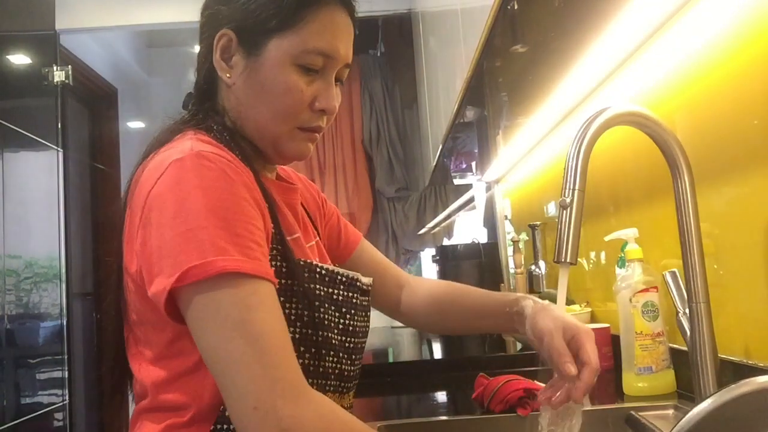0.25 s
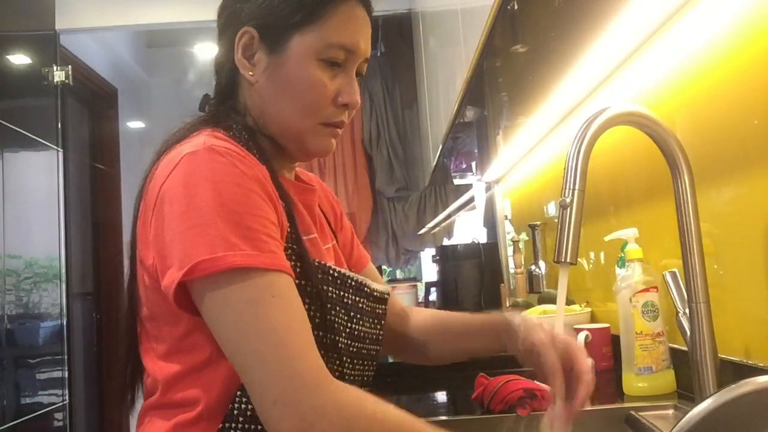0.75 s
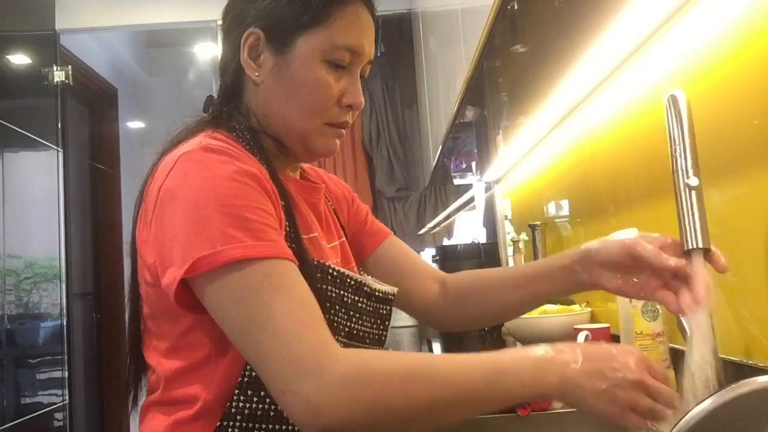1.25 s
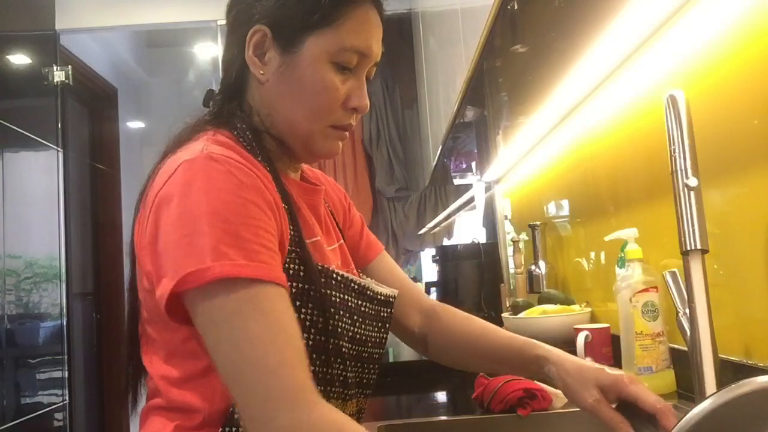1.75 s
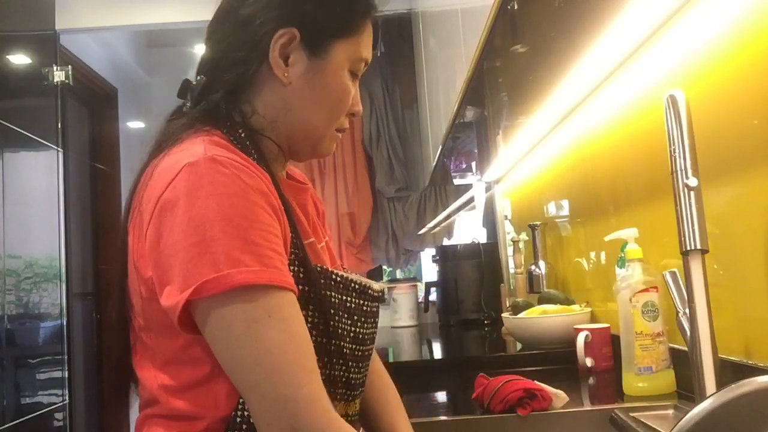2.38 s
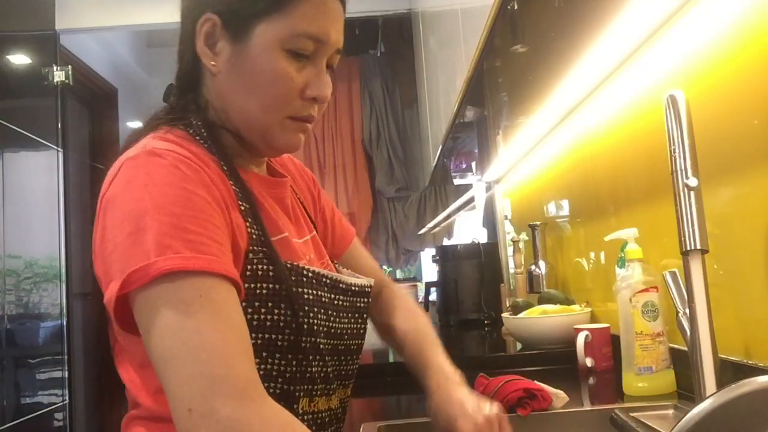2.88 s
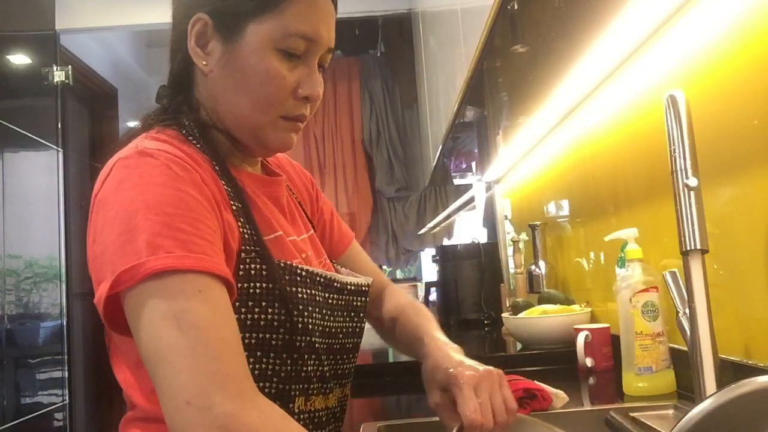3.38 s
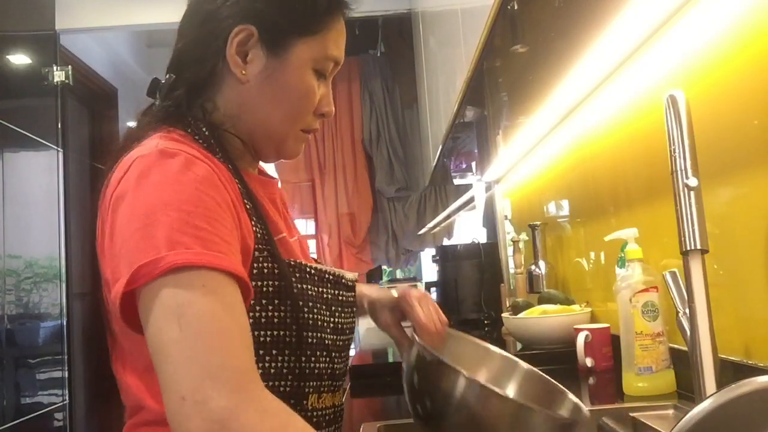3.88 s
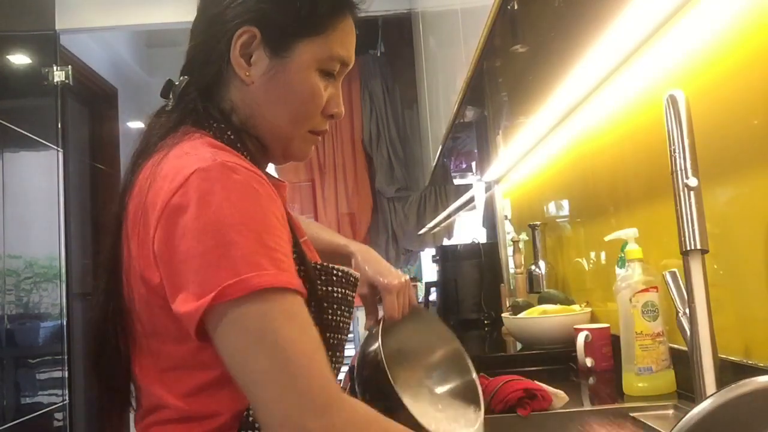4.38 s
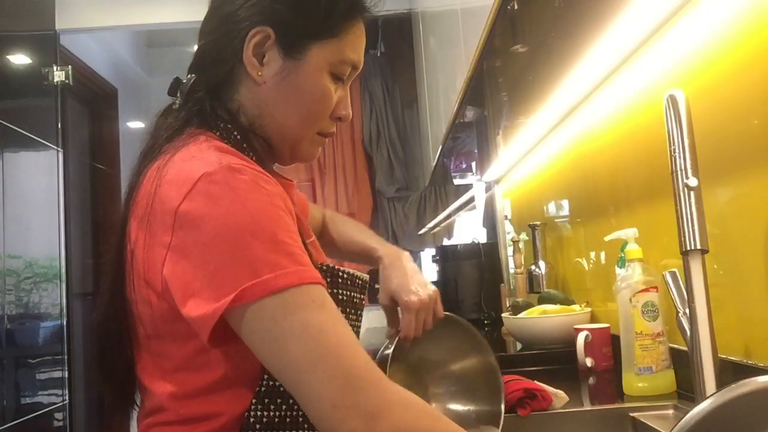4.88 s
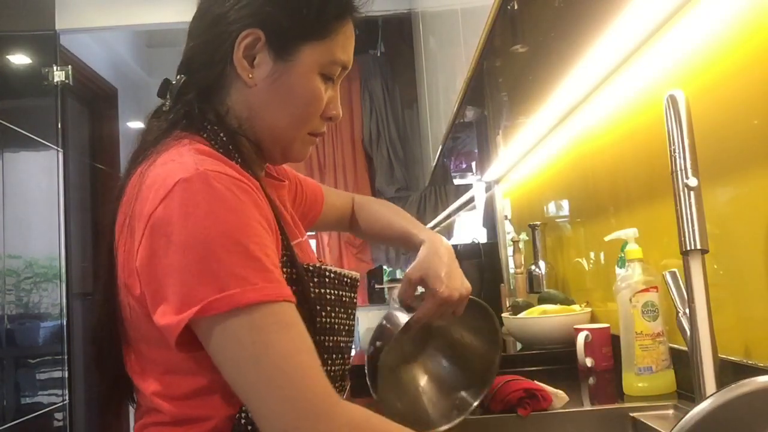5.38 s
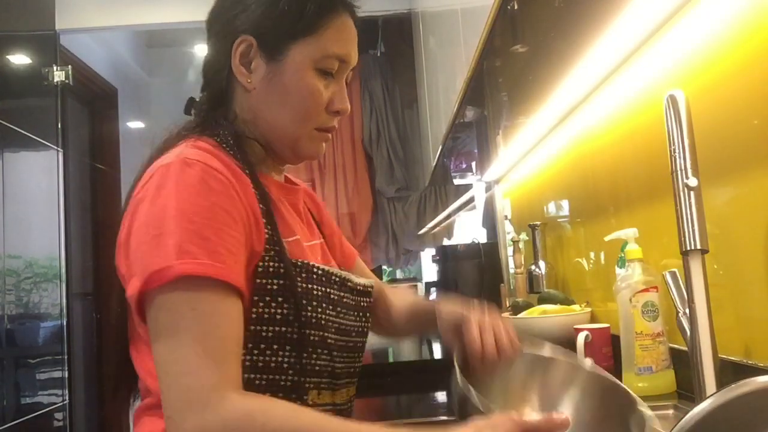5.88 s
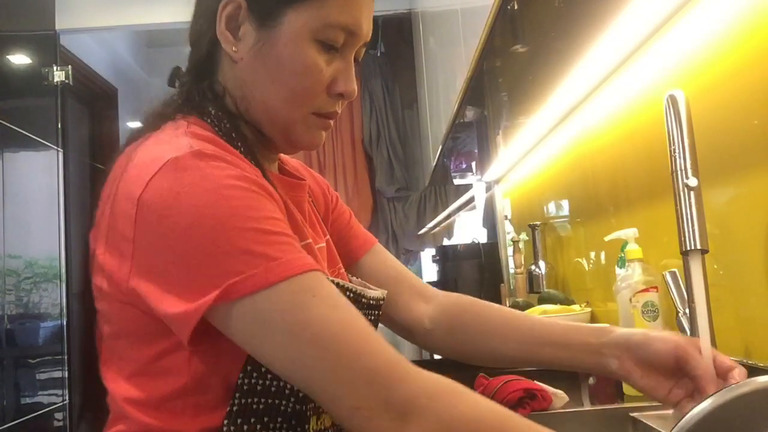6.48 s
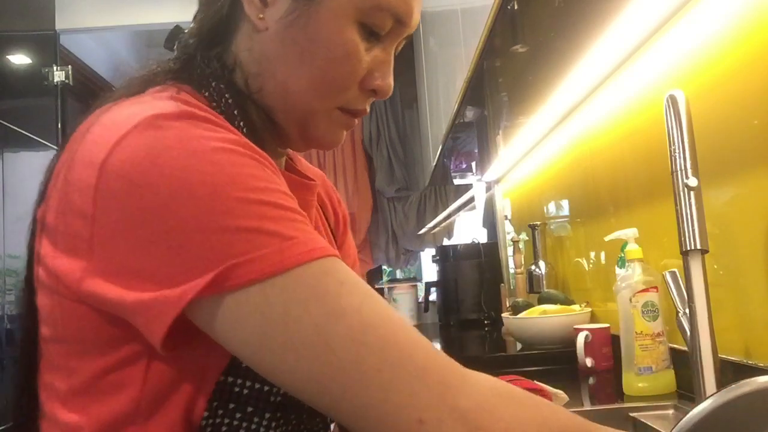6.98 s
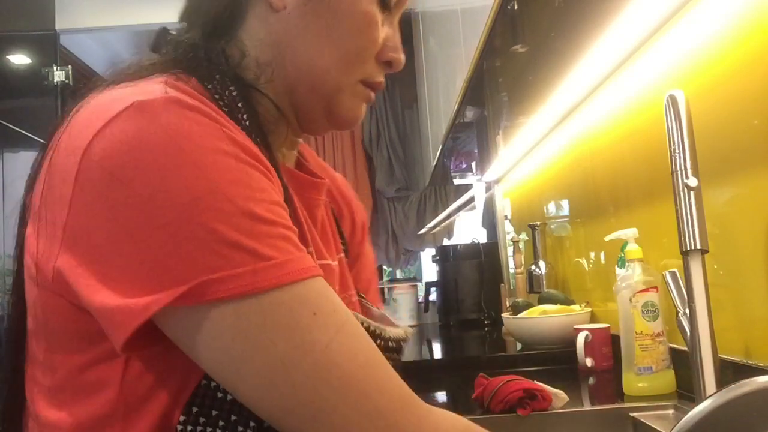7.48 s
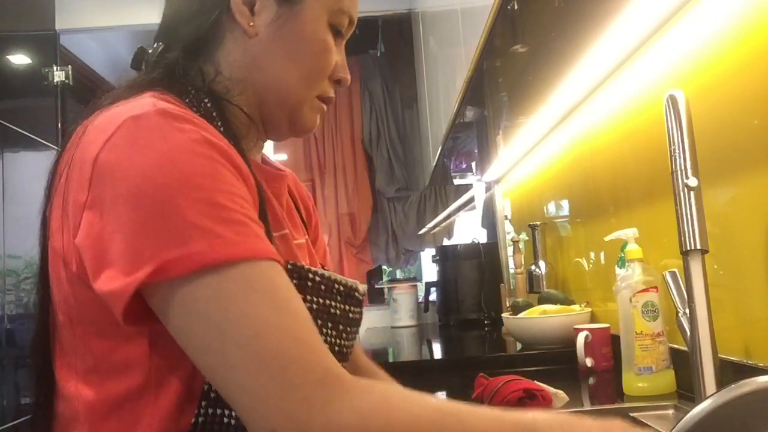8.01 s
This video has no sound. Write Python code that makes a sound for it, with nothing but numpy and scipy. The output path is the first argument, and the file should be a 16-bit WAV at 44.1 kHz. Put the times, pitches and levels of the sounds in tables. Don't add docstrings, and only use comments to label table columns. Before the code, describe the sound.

A close phone pickup in a hard, briefly echoing kitchen. From 0 to 1.4 s a thin tap stream hisses softly under wet splashes, tiny droplets pinging on steel, a gentle rub and deep basin bumps near 0.3 and 0.6 s. From 1.5 to 4.4 s it is sparse: light spits, faint ticks, dull low thumps around 2.5 and 3.2 s, a few wet clinks near 3.45 s. At 4.53 s a loud crack of china and steel bursts out, with hollow knocks, a hard scrape, bright rim rattling and a burst of splashing, fading by 5.2 s. A faint clink at 5.4 s, then quiet. At 6.15 s the bowl lands with a dull deep boom. Plates and steel clatter from 6.5 to 7.0 s, sharpest at 6.74, then hollow clanks at 7.2, 7.3 and 7.4 s with a watery gurgle. A low thud and small knock end it near 8.2 s.

```python
import sys
import numpy as np
from scipy import signal
from scipy.fft import rfft, irfft, next_fast_len
from scipy.io import wavfile
from scipy.ndimage import uniform_filter1d, map_coordinates

SR = 44100
rng = np.random.default_rng(int(sys.argv[2]) if len(sys.argv) > 2 else 0)


def nominal_scale(level):
    x = np.asarray(level, float) / 20
    return 10 ** x


def master_out(mix):
    frames = np.transpose(np.atleast_2d(mix))
    ceiling = np.clip(frames, -1, 1)
    pcm = np.round(ceiling * 32767).astype(np.int16)
    wavfile.write(sys.argv[1], SR, pcm)


N = 363825
T = np.arange(N) / SR

# t/s, spray level/dB, gurgle level/dB
STREAM = [(0.0, -49.5, -47.5), (0.62, -51.5, -59), (0.89, -47, -53.5), (4.55, -45, -51.5),
          (4.73, -32, -27.5), (5.26, -46.5, -50.5), (6.18, -49, -52), (6.82, -46, -49), (7.21, -47, -42),
          (7.4, -41, -27), (7.63, -49.5, -50), (8.25, -46.5, -53)]
# t/s, level over the spray/dB
SPITS = [
    (1.72, -3),
    (1.92, -5.5),
    (2.65, -4),
]
# f/Hz, level per Hz/dB
SPRAY = [(710, -15), (1200, -8.5), (1500, -5.5), (1670, -4), (2140, -6), (2660, -0.5), (5110, -3.5),
         (7360, -3.5), (9620, -4.5), (10400, -9.5), (11600, -3), (14000, -7), (15600, -7)]
# f/Hz, level per Hz/dB
GURGLE = [(15, -49), (25, -12.5), (87, 7), (129, 2), (318, -6.5), (425, -10), (687, -9), (757, -8.5),
          (1050, -9.5), (2500, -15), (3250, -39), (5500, -120)]
# fullest t/s, level/dB, build/s, release/s
DRUM = [(0.16, -35.5, 0.26, 0.14), (0.345, -20, 0.07, 0.64), (0.654, -24, .14, 0.17),
        (0.838, -42, .07, .09), (1.327, -40.5, 0.48, 0.11), (1.946, -34.5, 0.32, 0.2),
        (2.529, -27, 0.12, 0.49), (2.903, -39.5, 0.24, 0.083), (3.22, -24.5, 0.063, 0.094),
        (3.298, -39, .06, 0.055), (3.771, -40, 0.13, 0.19), (3.972, -34, .08, 0.22),
        (4.58, -13, 0.094, 0.07), (4.7, -31, .2, 0.17), (4.849, -19.5, 0.25, 0.087),
        (4.94, -25.5, 0.47, 0.21), (5.098, -37, 0.38, 0.093), (5.298, -39, 0.37, 0.11),
        (6.19, -15, 0.11, .09), (6.22, -25.5, .1, 0.55), (6.74, -37, 0.049, .25), (6.95, -28.5, 0.39, 0.36),
        (7.089, -31.5, 0.31, 0.072), (7.219, -26.5, 0.062, 0.075), (7.4, -22, 0.23, 0.53),
        (7.683, -36.5, 0.61, 0.37), (8.18, -23.5, 0.092, 0.25)]
# start t/s, hardest t/s, end t/s, rub level/dB, sizzle level/dB
SCRAPES = [
    (0.05, 0.528, 0.83, -36, -39),
    (2.797, 3.065, 3.54, -39.5, -41),
    (3.3, 3.634, 4.2, -37.5, -49),
    (4.47, 4.742, 5.3, -19, -18.5),
    (5.1, 5.308, 5.2, -50, -46),
    (6.505, 6.73, 6.8, -36, -37.5),
    (7.1, 7.368, 12.6, -46, -57),
]
# f/Hz, width/Hz, level/dB
BASIN = [(278.5, 17, -6.5), (332.4, 19, -4), (428.6, 9.2, -7.5), (541, 18, -7.5), (626, 36, -13.5),
         (716, 20, -13.5), (818, 40, -11), (904, 22, -13), (1075, 25, -12)]
# f/Hz, width/Hz, level/dB
DISHES = [(1220, 13, -29), (1530, 23, 7), (2060, 62, -16), (2524, 270, 5), (3610, 300, -5.5)]
# f/Hz, width/Hz, level/dB
BOWL = [(5300, 50, -15), (6420, 82, 0), (7120, 120, -4), (8350, 37, -14), (9150, 46, -3.5), (9600, 80, -8),
        (11200, 54, -6), (11900, 220, 3.5), (12480, 70, -8), (11600, 50, -10), (12950, 71, -9),
        (13300, 140, 4.5)]
# t/s, peak level/dB, clink f/Hz, basin level/dB
SPLASHES = [(0.0952, -31, 1970, 4), (0.1143, -27, 1645, -12), (0.149, -34, 2020, -20),
            (0.2683, -63, 2100, -29), (0.3054, -27.5, 2620, -15), (0.3217, -41.5, 2620, 9),
            (0.3644, -25, 1647, -9.5), (0.474, -34.5, 2600, 4), (0.4996, -32.5, 2060, 2),
            (0.5444, -36, 1070, -20), (0.6066, -20.5, 2630, -29), (0.6335, -41, 1720, -16),
            (0.6866, -26, 1372, -27), (1.173, -28.5, 3060, -19), (1.3325, -38.5, 1416, -7),
            (1.402, -38, 1484, -13), (3.4077, -26, 1830, -45), (3.4475, -33.5, 1570, -16),
            (3.4943, -25.5, 2750, -12), (3.899, -32, 1720, -5)]
# t/s, peak level/dB, clink f/Hz, basin level/dB
WET_TICKS = [
    (1.7, -38.5, 1550, -23),
    (1.889, -36, 1470, -2.5),
    (2.5426, -40, 1275, 4.5),
    (2.709, -41, 1770, -37),
    (3.1872, -28.5, 1530, -20),
    (3.5295, -34, 1543, -23),
    (3.708, -28.5, 2340, -21),
    (3.735, -32.5, 1335, -25),
]
# t/s, peak level/dB, clink f/Hz, basin level/dB
CHINA = [(4.5289, -3.5, 1009, 2), (4.775, -8, 1500, -7.5), (4.7944, -13.5, 1530, 5),
         (4.8341, -13.5, 1640, 2), (4.9065, -5.5, 2060, -12.5), (5.42, -29, 3970, -24),
         (6.7591, -15, 2320, -2), (6.9348, -20, 2290, -14.5), (7.3226, -12.5, 1200, -5),
         (7.3847, -17, 2890, -6), (7.4393, -19, 1126, 4), (8.1943, -22, 1480, -4.5),
         (8.2154, -24, 1380, -7)]
# t/s, peak level/dB, clink f/Hz, basin level/dB
STEEL = [(4.5795, -10, 1190, -2), (4.6166, -6.5, 1120, -0.5), (4.6783, -8, 1109, -8),
         (4.8921, -8.5, 1650, -9.5), (4.9602, -15.5, 1250, -17), (5.039, -21, 1935, -18),
         (5.0794, -41, 1650, -23), (5.1445, -27.5, 1247, -41), (5.184, -29, 1760, -38),
         (6.4946, -26.5, 2270, 0.5), (6.538, -19, 1580, -10), (6.5704, -23, 1526, -7),
         (6.6743, -25, 1660, -1.5), (6.689, -22, 1315, -10), (6.7358, -8.5, 2735, -9.5),
         (6.7993, -19, 2340, 0.5), (6.959, -21, 1500, -8.5), (7.2098, -18, 1533, 0.5),
         (7.416, -12, 2370, 2), (7.5823, -24, 2360, -30)]
# t/s, peak level/dB, clink f/Hz, basin level/dB
SET_DOWN = [
    (6.1365, -34, 1600, 6),
    (6.1517, -23, 1550, 6.6),
    (6.158, -26, 820, 4.3),
    (6.205, -32.5, 700, 4.6),
    (8.1409, -40, 1590, 11),
]
# f/Hz, t60/s
KITCHEN = [(150, 0.44), (700, 0.47), (3000, 0.34), (8000, 0.23), (15000, 0.11)]
# t/s, peak level/dB, wall f/Hz, rim level/dB
FLOOR_BUMPS = [
    (1.896, -35, 156, -15),
    (2.467, -22.5, 149, -15),
    (2.548, -43, 125, 7),
    (3.197, -23, 131.5, -36),
    (3.736, -36.5, 177, -24),
    (3.953, -32.5, 131.5, -6),
    (6.146, -15, 198, -3),
    (6.199, -15.5, 130, -0.5),
    (8.139, -17.5, 140, -6.5),
]
# t/s, peak level/dB, wall f/Hz, rim level/dB
SIDE_BUMPS = [
    (0.32, -29, 170, -2.5),
    (0.603, -25, 169, -1.5),
    (4.467, -35, 212, -3),
    (4.689, -17, 173, -0.5),
    (6.298, -23.5, 169, -6.5),
    (6.759, -37, 163, 11),
    (6.959, -23, 133, -9),
]
# t/s, peak level/dB, wall f/Hz, rim level/dB
EDGE_BUMPS = [(0.089, -30.5, 161, -19), (4.529, -7, 154, -3), (4.576, -10.5, 167, -25),
              (4.619, -18.5, 131, 8), (4.792, -15, 150, -5), (4.839, -19, 121, -12), (4.901, -43, 134, 8),
              (6.155, -32.5, 148, 12), (6.712, -23.5, 155, -5.5), (7.207, -22.5, 120, 7.5),
              (7.323, -26.5, 145, 13), (7.415, -18.5, 147, -3), (8.223, -17, 143, -8)]
# t/s, peak level/dB, f/Hz
HOLLOW_NOTES = [(0.1, -26.5, 762), (0.305, -31, 845), (0.498, -30, 559), (0.687, -25, 682),
                (1.249, -39, 436), (1.401, -31, 703), (1.798, -38.5, 708), (2.165, -39, 686),
                (2.54, -34, 459), (2.559, -32.5, 695), (3.52, -30.5, 842), (4.541, -2.5, 724),
                (4.629, -6, 680), (6.495, -28.5, 806), (6.632, -22, 719), (6.754, -20, 717),
                (7.21, -10.5, 703), (7.321, -8.5, 557), (7.413, -12, 700), (8.198, -18.5, 727)]
# t/s, peak level/dB, f/Hz
DROPS = [(.104, -34, 800), (.108, -36, 1260), (.114, -32, 760), (.127, -31, 2880), (.27, -37, 3800),
         (.298, -40, 2100), (.31, -36, 1460), (.324, -32, 2550), (.328, -39, 3500), (.369, -35, 2150),
         (.372, -36, 2950), (.386, -35, 1550), (.43, -36, 2550), (.52, -37, 2000), (.546, -38, 4300),
         (.59, -37, 1050), (.603, -32, 3350), (.609, -22, 2350), (.632, -34, 3700), (.645, -35, 1800),
         (.65, -35, 2390), (.662, -34, 2800), (.715, -38, 3050), (.74, -35, 2600), (.76, -40, 1260),
         (.93, -39, 2100), (1.18, -33, 3700), (1.225, -40, 4500)]
# t/s, peak level/dB, f/Hz
THUDS = [
    (1.655, -32.5, 185),
    (2.468, -30, 234),
    (3.219, -38, 150),
    (4.535, -14.5, 432),
    (7.619, -29.5, 160.6),
]
# t/s, peak level/dB, f/Hz
CHINKS = [(3.4074, -30, 2880), (4.5287, -4.5, 2564), (4.9062, -11, 2630), (6.147, -23, 7600),
          (6.151, -23, 8200), (4.8955, -13, 7500), (7.4158, -9, 2420), (6.7357, -12, 5900),
          (6.7362, -15, 5400), (4.533, -12, 1540), (4.556, -14, 1450), (6.539, -22, 1580),
          (6.689, -22, 1810)]
# t/s, peak level/dB, f/Hz
PINGS = [
    (4.679, -24, 7400),
    (5.1841, -29.5, 6460),
    (4.7104, -30, 9150),
    (4.7104, -32, 7400),
    (4.679, -20, 9140),
    (4.855, -30, 5900),
    (4.912, -21.5, 3520),
    (6.5281, -33, 7700),
]
# t/s, peak level/dB
CRACKS = [(0.6048, -33), (1.175, -32), (1.889, -34), (3.4945, -33), (4.5283, -7.5), (4.5794, -23),
          (4.7944, -15), (4.8484, -20), (6.6747, -27), (6.7363, -12.5), (7.2105, -24), (7.4155, -19),
          (8.197, -30), (8.216, -34)]
# f/Hz, level/dB, t60/s
PLATE = [(1198, -1, 0.2), (1520, -1.5, .2), (1784, -5.5, 0.18), (2060, -11, 0.28), (2460, -5, 0.065),
         (2670, -5, .1), (2813, -9, .15), (3090, -10.5, .25), (3580, -8, 0.12), (4120, -14, 0.27),
         (4440, -14, .12), (5430, -8, .22), (6020, -5, 0.21), (7273, -16, .14)]
# t/s, peak level/dB, favoured f/Hz
PLATE_HITS = [(4.5283, -10, 3000), (4.774, -15, 1500), (4.9064, -14, 2400), (6.4954, -39, 2300),
              (6.6746, -30, 3400), (6.688, -25.5, 1700), (6.736, -13.5, 3500), (6.765, -30, 6100),
              (6.825, -30, 5900), (6.785, -23, 6000), (6.9388, -29, 5000), (7.2095, -18.5, 2170),
              (7.326, -18, 1150), (7.322, -31, 3400), (7.391, -23, 2900), (7.3973, -27, 4200),
              (7.4136, -14, 2230), (8.197, -32, 2600), (8.216, -28, 2650)]
# blow t/s, level at the slide's start/dB, length/s
SKIDS = [
    (0.605, -43, .006),
    (4.528, -33, 0.01),
    (6.738, -19, 0.011),
    (7.2093, -20, 0.0057),
    (7.3225, -29, 0.0067),
    (7.418, -17, 0.0057),
    (8.192, -41, 0.0067),
]
# t/s, peak level/dB
RATTLE = [(4.5301, -25), (4.6096, -12), (4.6344, -11.5), (4.7104, -13), (4.7354, -26), (4.7564, -18),
          (4.7904, -21), (4.849, -17), (4.8885, -6.5), (4.945, -16), (5.076, -33), (5.183, -19),
          (6.5281, -24), (6.7994, -33), (7.4143, -15.5)]


def unit(x):
    return x / np.sqrt(np.mean(x ** 2) + 1e-20)


def along(points, hz):
    f, v = np.transpose(points)
    return np.interp(np.log(hz + 1), np.log(f + 1), v)


def curves(rows):
    s, *cols = np.transpose(rows)
    return [np.interp(T, s, c) for c in cols]


def wobble(rate):
    return map_coordinates(rng.standard_normal(int(N * rate / SR) + 4), [T * rate])


def filtered(x, response):
    m = next_fast_len(N + SR // 2)
    return irfft(rfft(x, m) * response(np.fft.rfftfreq(m, 1 / SR)), m)[..., :N]


def high_pass(x, order_two_hz):
    return filtered(x, lambda hz: (1j * hz / (order_two_hz + 1j * hz)) ** 2)


def body(modes, lo_hz, hi_hz, dense_db):
    def response(f):
        band = (1j * f / (lo_hz + 1j * f) * hi_hz / (hi_hz + 1j * f)) ** 2
        clear = 0
        for k, (centre, width, db) in enumerate(modes):
            resonance = 1j * f * width / (centre * centre - f * f + 1j * f * width)
            clear = clear + (-1) ** k * nominal_scale(db) * resonance
        h = band * (nominal_scale(dense_db) + clear)
        return h / np.sqrt(np.mean(abs(h) ** 2))
    return response


def unsteady(hz, t, drift):
    wander = np.cumsum(rng.standard_normal(len(t)))
    return np.sin(2 * np.pi * hz * t + drift * np.sqrt(hz / SR) * wander)


def add(x, s, sound):
    part = x[round(s * SR):][:len(sound)]
    part += sound[:len(part)]


def rush(spectrum, patchy_db):
    z = signal.stft(rng.standard_normal(N + 512), nperseg=512)[2]
    field = uniform_filter1d(rng.standard_normal(z.shape), size=5, axis=0)
    field = uniform_filter1d(field, size=8, axis=1)
    x = signal.istft(z * nominal_scale(patchy_db * unit(field)), nperseg=512)[1][:N]
    return unit(filtered(x, lambda hz: nominal_scale(along(spectrum, hz))))


def grains(count, mid_hz, spread, cycles, size_db):
    r, k = rng.random((count, 2)), np.arange(300)
    hz = np.clip(mid_hz * np.exp(spread * rng.standard_normal((count, 1))), 300, 15000)
    turns = hz * k / SR
    shape = np.sin(2 * np.pi * turns * (1 + 0.17 * turns / cycles)) * np.exp(-3 * turns / cycles)
    size = nominal_scale(-size_db * np.log(r[:, 1:] + 0.0012))
    at = (r[:, :1] * N).astype(int) + k
    return unit(np.bincount(at.ravel(), (shape * size).ravel(), N + 300)[:N])


def tap():
    spray_db, gurgle_db = curves(STREAM)
    swell = nominal_scale(0.35 * wobble(2.5) + 0.45 * wobble(14))
    hiss = rush(SPRAY, patchy_db=0.7)
    spit_s = 0.086
    spit_gain = nominal_scale(-32) + sum(nominal_scale(db) * np.exp(-((T - s) / spit_s) ** 2) for s, db in SPITS)
    spits = spit_gain * grains(count=1500, mid_hz=7260, spread=0.14, cycles=7.3, size_db=1.0)
    bubbles = grains(count=2500, mid_hz=1500, spread=0.49, cycles=10.4, size_db=2.0)
    low = rush(GURGLE, patchy_db=2.0) + nominal_scale(-16.5) * bubbles
    return swell * (nominal_scale(spray_db) * (hiss + spits) + nominal_scale(gurgle_db + 2.0) * low)


def drum():
    floor_hz, rest_db, build_bend, release_bend = 93.3, -77, 3.6, 4.3
    s, db, build, release = np.transpose(DRUM)[..., None]
    t = T[::32]
    rising = t < s
    share = np.clip(np.where(rising, 1 - (s - t) / build, 1 - (t - s) / release), 0, 1)
    share = share ** np.where(rising, build_bend, release_bend)
    swing = np.interp(T, t, (nominal_scale(db) * share).max(axis=0) + nominal_scale(rest_db))
    flutter = nominal_scale(3.0 + 1.06 * wobble(25))
    turns = np.cumsum(floor_hz + 3 * wobble(15)) / SR
    return flutter * swing * np.sin(2 * np.pi * turns)


def strokes():
    ease_in_db, ease_out_db = 22.5, 21.5
    gains = np.zeros((2, N))
    for start, hardest, end, rub_db, sizzle_db in SCRAPES:
        moments = [start - 0.03, start, hardest, end, end + 0.026]
        press_db = np.interp(T, moments, [-60, -ease_in_db, 0, -ease_out_db, -60])
        gains += nominal_scale(press_db + np.array([[rub_db], [sizzle_db]]))
    return gains


def sheet(x, t60, ring_db):
    t = T[:SR // 6]
    modes = rng.standard_normal(len(t)) * nominal_scale(-60 * t / t60)
    return x + nominal_scale(ring_db) * signal.fftconvolve(x, modes / np.linalg.norm(modes))[:N]


def contacts(rows, rise_s, spread, cycles, crack_db, wash_db, clink_db, shine_db):
    drive, clink, t = np.zeros((3, N)), np.zeros(N + SR), T[:SR // 4]
    u, others = T[:1100], np.arange(24)[:, None] > 0
    for s, db, hz, basin_db, bowl_db, t60 in rows:
        fade = (1 - np.exp(-t / rise_s)) * (nominal_scale(-60 * t / t60) + nominal_scale(crack_db - 60 * t / 0.015))
        for layer, rel_db in zip(drive, (basin_db, wash_db, bowl_db + shine_db)):
            add(layer, s, nominal_scale(db + rel_db) * fade * rng.standard_normal(len(t)))
        size, late = rng.standard_normal((2, 24, 1)) * others
        place = rng.permutation(np.linspace(-2, 2, num=24))[:, None] * others
        pitch = np.where(others, (hz ** 2 * 2600) ** (1 / 3), hz) * np.exp(spread * place)
        late = 0.25 * abs(late)
        ring = nominal_scale(db + clink_db + 1.7 * size - 3.0 * place ** 2 - 1.8 * others - 60.5 * late)
        ring = ring * np.exp(-3 * u * pitch / cycles) * (1 - np.exp(-u / 0.00018))
        ring = ring * np.sin(2 * np.pi * pitch * u)
        at = ((s + late * t60) * SR).astype(int) + np.arange(len(u))
        first = at.min()
        clink[first:at.max() + 1] += np.bincount((at - first).ravel(), ring.ravel())
    return drive, clink[:N]


def clatter():
    soft = [(*row, -37, 0.13) for row in SPLASHES] + [(*row, 3.5, 0.13) for row in WET_TICKS]
    loud = [(*row, -17.5, 0.12) for row in CHINA]
    for s, db, hz, basin_db in STEEL:
        bowl_db = -6 - 0.15 * (db + 26.5)
        loud.append((s, db, hz, basin_db, bowl_db, 0.135))
    flat = [(*row, -10, 0.16) for row in SET_DOWN]
    dull = contacts(flat, rise_s=0.0046, spread=0.245, cycles=36, crack_db=9,
                    wash_db=-13, clink_db=-7, shine_db=2.0)
    wet = contacts(soft, rise_s=0.0043, spread=0.36, cycles=41, crack_db=4,
                   wash_db=-6.5, clink_db=-4.5, shine_db=-0.5)
    hard = contacts(loud, rise_s=0.0049, spread=0.4, cycles=36.3, crack_db=12.5,
                    wash_db=-3.0, clink_db=-6.0, shine_db=0.5)
    stick_slip = nominal_scale(3.9 * wobble(60) + 2.3 * wobble(220))
    grain = nominal_scale(1.2 * np.array([wobble(70), wobble(90), wobble(110)]) + 2.2 * wobble(260))
    drive = (wet[0] + hard[0] + dull[0]) * grain
    rub, sizzle = strokes()
    grit = stick_slip * rng.standard_normal((3, N))

    basin = nominal_scale(-4.5) * drive[0] + nominal_scale(-22.0) * rub * grit[0]
    basin = filtered(basin, body(BASIN, 316, 950, dense_db=-10.5))
    dishes = sheet(nominal_scale(-14.0) * drive[1] + nominal_scale(-13.5) * rub * grit[1], t60=0.046, ring_db=1.0)
    dishes = filtered(dishes, body(DISHES, 970, 2180, dense_db=-2.5))
    bowl = sheet(nominal_scale(-9.5) * drive[2] + nominal_scale(-19.0) * sizzle * grit[2], t60=0.048, ring_db=-3.5)
    bowl = filtered(bowl, body(BOWL, 2200, 12000, dense_db=-6.5))
    return basin + dishes + bowl + wet[1] + hard[1] + dull[1]


def kitchen(x):
    out, hop = np.zeros(N + SR), SR // 8
    hz, t, z = signal.stft(rng.standard_normal((N // hop + 1, SR // 2)), SR, nperseg=256)
    tails = signal.istft(z * nominal_scale(-60 * t / along(KITCHEN, hz)[:, None]), SR, nperseg=256)[1]
    x = np.pad(x, (250, 0))
    for k, tail in enumerate(tails):
        add(out, k * hop / SR, signal.fftconvolve(x[k * hop:][:hop], tail / np.linalg.norm(tail)))
    return out[:N]


def bumps():
    out, t = np.zeros(N), T[:SR // 3]
    bump_t60 = 0.19
    for rows, rim_hz in ((FLOOR_BUMPS, 228.3), (SIDE_BUMPS, 290.6), (EDGE_BUMPS, 360)):
        for s, db, wall_hz, rim_db in rows:
            fade = nominal_scale(db - 90 * t / bump_t60) * (1 - np.exp(-t / 0.0016))
            shake = uniform_filter1d(rng.standard_normal(len(t)), size=70)
            shake -= uniform_filter1d(shake, size=260)
            wall = 1.19 * unsteady(wall_hz, t, drift=0.43)
            edge = 0.8 * unsteady(rim_hz, t, drift=0.8) + 2.6 * shake
            add(out, s, fade * (wall + nominal_scale(rim_db) * edge))
    return high_pass(out, 75)


def notes():
    out, t = np.zeros(N), T[:SR // 4]
    kinds = (HOLLOW_NOTES, 0.2), (PINGS, 0.24), (CHINKS, 0.046), (THUDS, 0.44), (DROPS, 0.085)
    for rows, t60 in kinds:
        for s, db, hz in rows:
            drift = 0.24 if hz > 2000 else 0.26
            held = 0.66 if db < -29.5 else 1
            fade = nominal_scale(db - 3.0 - 85 * t / (t60 * held)) * (1 - np.exp(-t / 0.00069))
            add(out, s, fade * unsteady(hz, t, drift))
    return out


def cracks():
    gain, t = np.zeros(N), T[:SR // 20]
    crack_t60 = 0.026
    for s, db in CRACKS:
        add(gain, s, nominal_scale(db - 60 * t / crack_t60) * (1 - np.exp(-t / 0.00073)))
    return filtered(gain * rng.standard_normal(N), body([], 1500, 6000, dense_db=0)) / 2


def plate():
    out, slide, t = np.zeros(N), np.zeros(N), T[:SR // 5]
    favour_db = 17.5
    knock_db, knock_t60 = 12.5, 0.029
    hz, level, t60 = np.transpose(PLATE)[..., None]
    for s, db, favoured_hz in PLATE_HITS:
        share = level - favour_db * np.log2(hz / favoured_hz) ** 2 + 2.0 * rng.standard_normal(hz.shape)
        fade = nominal_scale(share - 60 * t / t60) * (1 + nominal_scale(knock_db - 60 * t / knock_t60))
        ring = (fade * unsteady(hz, t, drift=0.14)).sum(axis=0)
        add(out, s, nominal_scale(db - 10) * (1 - np.exp(-t / 0.00046)) * ring)
    for s, db, length in SKIDS:
        progress = T[:round(length * SR)] / length
        add(slide, s - length, nominal_scale(db + 8 * progress))
    return out + filtered(slide * rng.standard_normal(N), body([], 700, 3500, dense_db=0)) / 2


def rim():
    out, t = np.zeros(N), T[:SR // 8]
    for s, db in RATTLE:
        ring = 0
        for hz, width, level in BOWL:
            fade = nominal_scale(level + 2.9 * rng.standard_normal() - 23 * width * t * 0.73)
            ring = ring + fade * unsteady(hz, t, drift=0.041)
        snap = 2.8 * nominal_scale(-60 * t / 0.033) * np.diff(rng.standard_normal(len(t) + 1))
        add(out, s, nominal_scale(db - 13.5) * (1 - np.exp(-t / 0.0026)) * (ring + snap))
    return out


def scene():
    hollow = notes()
    steel = clatter() + rim() + bumps() + plate() + cracks()
    echo = nominal_scale(-6.5) * kitchen(steel + nominal_scale(-4.5) * hollow)
    return (steel + hollow + echo + drum() + tap())[None]


def top_cut(x):
    return signal.sosfilt(signal.butter(12, 16800, fs=SR, output="sos"), x)


def record(dry):
    x = high_pass(dry, 30)
    x = x / (1 + abs(x / 1.06) ** 5) ** (1 / 5)
    x = filtered(x, lambda hz: hz < 15830)
    return top_cut(x)


dry = scene()
out = record(dry)
master_out(out)
```